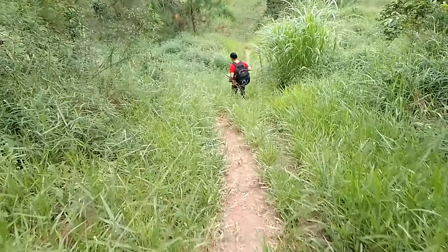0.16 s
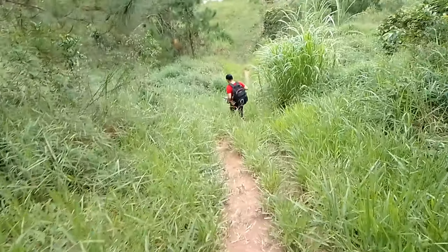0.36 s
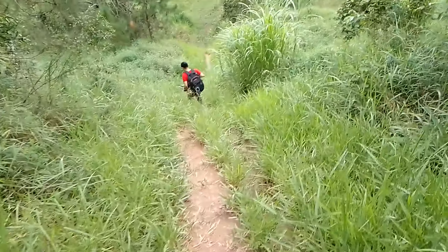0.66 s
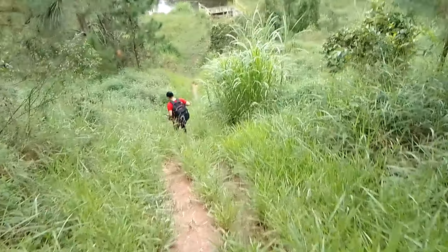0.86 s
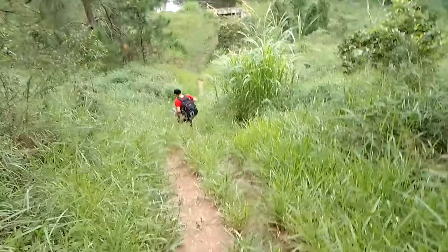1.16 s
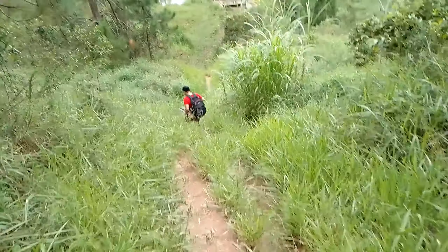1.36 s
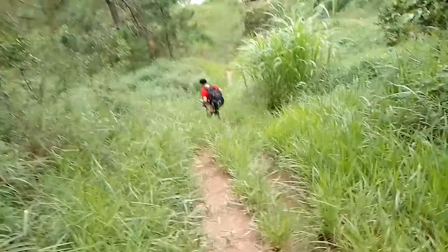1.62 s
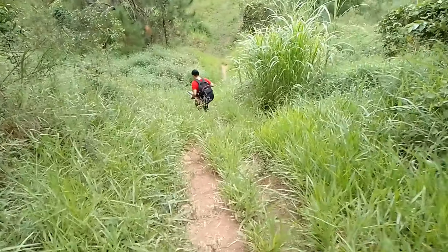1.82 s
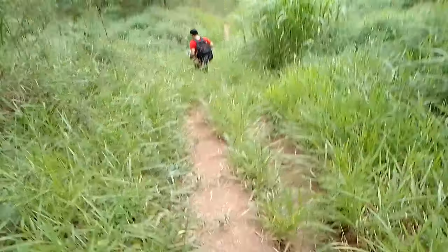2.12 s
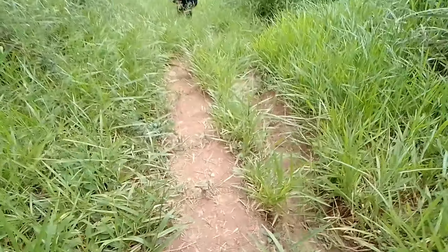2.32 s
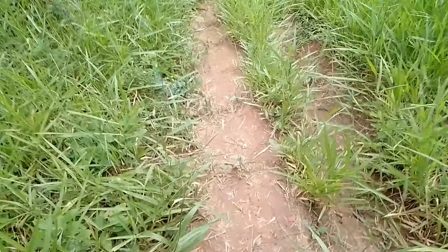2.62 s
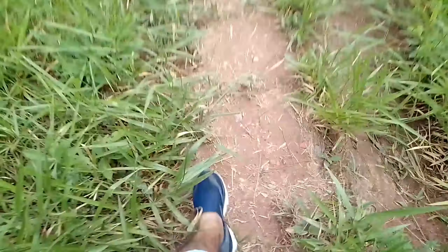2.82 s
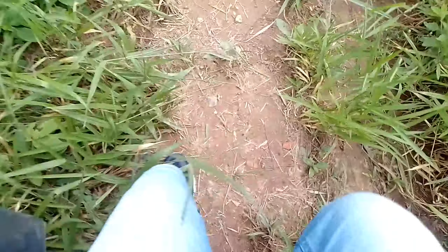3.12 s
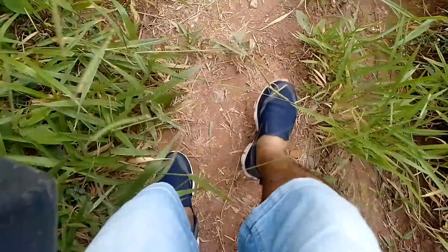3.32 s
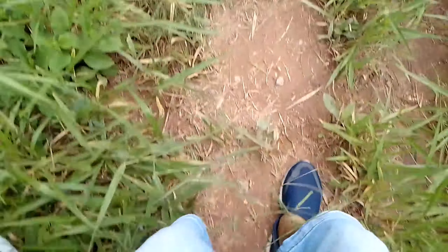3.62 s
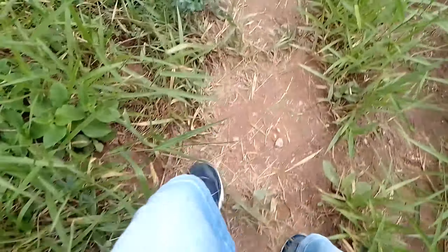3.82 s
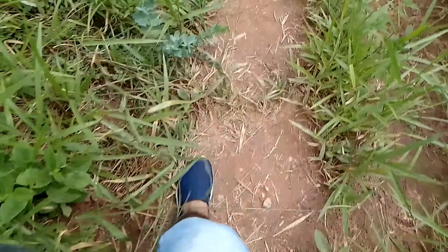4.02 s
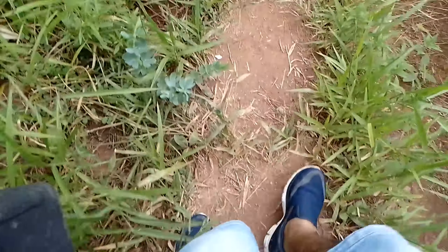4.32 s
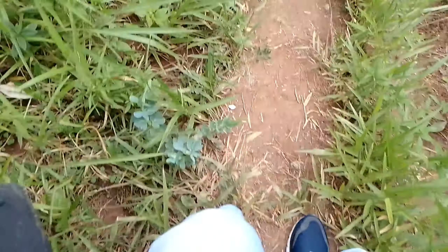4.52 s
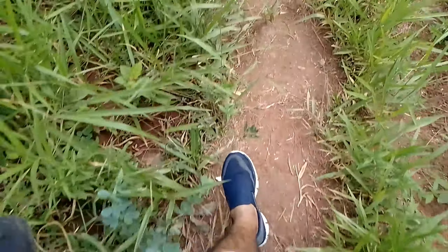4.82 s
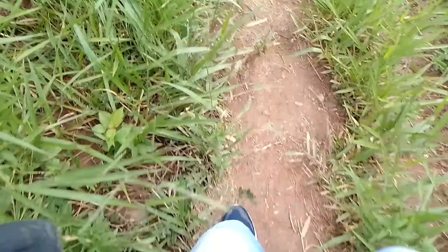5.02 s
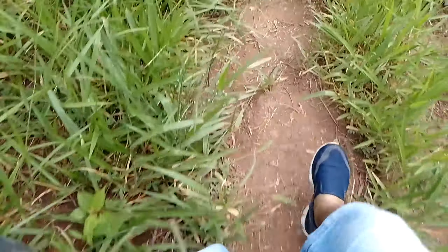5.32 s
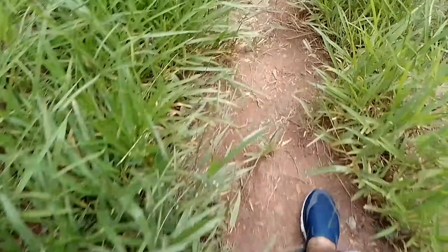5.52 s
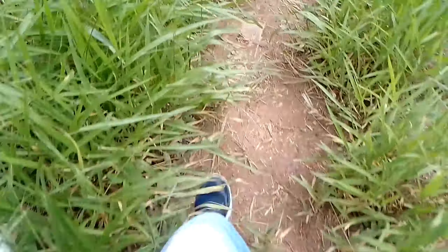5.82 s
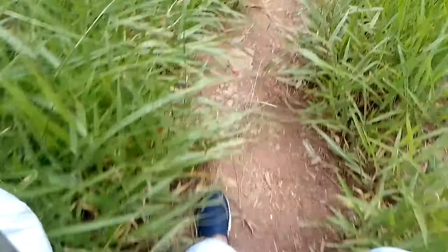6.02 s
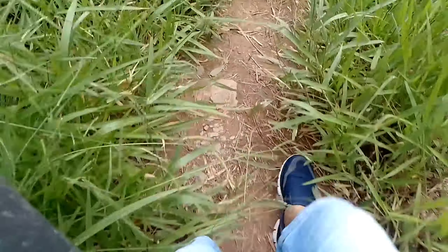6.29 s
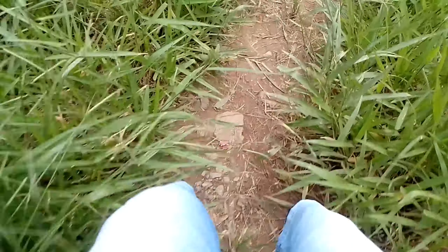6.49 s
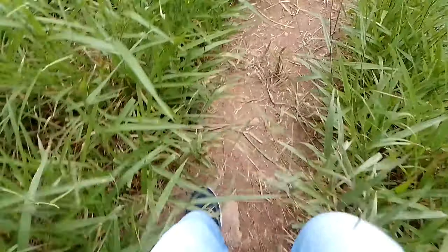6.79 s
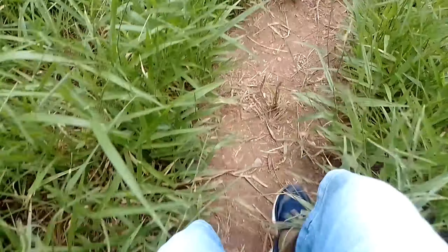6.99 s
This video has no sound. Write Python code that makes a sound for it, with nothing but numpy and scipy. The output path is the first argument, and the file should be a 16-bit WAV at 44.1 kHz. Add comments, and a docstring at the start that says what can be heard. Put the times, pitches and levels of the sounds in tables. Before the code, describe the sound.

A close, dry, mono outdoor sound from a small handheld camera, with dulled extreme treble. From 0 to 1.8 s, brisk swishing and fine hissing of grass against legs mixes with many sharp, hard ticks on the camera case, clustered around 0.6 s with a strong knock, plus low hand jolts and scuffing soles. Around 2.3, 2.7 and 3.0 s come heavier hollow knocks; the grass thins between them, with thin sliding blade notes near 2.5 s. After 3.2 s the clatter nearly stops, save one tick at 4.1 s. Dull thuds land near 3.5 and 4.15 s amid crunchy straw and swishes. About 4.8 to 5.6 s is calmer, a soft rustle with a faint high rasping insect. Crisp scuffs and footfalls return from 5.6 to 6.5 s, then the rustle continues with faint chirps to about 7.1 s.

```python
"""A dirt path through tall grass in a meadow: someone walks along it, a small camera in hand.
Blades swish along the legs and soles scuff the soil, as coloured friction noise swelling with each stroke.
Sharp dry ticks and a few knocks, mostly in the first half, are impulse responses of the camera case.
Short grit bursts and damped low tones mark scuffs and footfalls; an insect chirps a faint rasping note."""
import sys
import numpy as np
from scipy import signal
from scipy.fft import rfft, irfft, next_fast_len
from scipy.io import wavfile
from scipy.ndimage import map_coordinates

SR = 44100
rng = np.random.default_rng(int(sys.argv[2]) if len(sys.argv) > 2 else 0)


def materialize(psi):
    """Save the field psi as 16-bit PCM at rate SR to the path in sys.argv[1].

    A 1-D psi becomes a single channel; in a 2-D psi each row is a channel.
    """
    bounded = np.clip(np.atleast_2d(psi).T, -1, 1)
    quanta = np.round(bounded * 32767).astype(np.int16)
    wavfile.write(sys.argv[1], SR, quanta)


N = 315315  # samples, 7.15 s

# bouts of the insect: start_s, length_s, rate_chirps_per_s, level_db (before scatter)
CHIRP_BOUTS = [(3.72, .05, 8.3, -56), (4.37, .3, 8, -58.5), (4.82, .83, 10.25, -61.5),
               (6.315, .45, 10.4, -55), (6.997, .15, 9.7, -54.5)]
CHIRP_LENGTH_S = .038  # twice the standard deviation of the Gaussian swell
CHIRP_JITTER_S, CHIRP_SCATTER_DB = .005, 1.5

# light taps on the camera near its microphone: start_s, strength_db, contact_hardness_hz, body_pitch_hz
TICKS = [(0.1402, 10, 960, 1360), (0.347, 13, 6800, 1420), (0.4502, 16.5, 6840, 1320),
         (0.5547, 13, 2890, 1230), (0.5649, 12.5, 900, 1230), (0.6054, 13.5, 3600, 1160),
         (0.6103, 16, 590, 1520), (0.614, 8, 1040, 530), (0.6171, 4.5, 880, 530), (0.6714, 12, 2410, 1050),
         (0.9562, 13.5, 6060, 1410), (0.9806, 6.5, 1240, 830), (0.9896, 7.5, 1470, 780),
         (1.0525, 17, 4900, 1250), (1.1633, 14, 4020, 1270), (1.2033, 15, 3230, 1060),
         (1.2932, 10, 1930, 1100), (1.5624, 10, 4080, 1300), (1.5823, -2, 1680, 530),
         (1.5897, 2.0, 820, 527), (1.6186, -3.5, 3790, 680), (1.6655, 14, 3270, 1140),
         (1.7106, 13.5, 3330, 1140), (1.7645, 15, 3850, 1130), (2.0072, 13, 4600, 1400),
         (2.3138, 13.5, 5200, 1210), (2.4692, 18.5, 5130, 1260), (2.7003, 3, 730, 855),
         (2.724, 5.5, 2830, 1000), (3.1388, 6, 1140, 950), (4.0925, 12, 9900, 1370)]
# heavier knocks on the handled case: start_s, strength_db, contact_hardness_hz, body_pitch_hz
KNOCKS = [(0.578, 19.5, 7000, 730), (1.7212, 4, 2860, 510), (2.3328, 19.5, 3370, 683),
          (2.7063, 20, 7000, 960), (3.0324, 19.5, 3070, 917), (3.1613, 15.5, 1530, 600),
          (3.1837, 10.5, 1590, 663), (3.199, 1.5, 500, 450)]
# response of the case to a tick: frequency_hz, gain_db
TICK_BODY = [(30, -41.5), (100, -18), (300, -6.5), (600, -3.5), (950, -2.5), (1350, .5), (1700, -2),
             (2150, -5.5), (3000, -9), (4400, -8), (6500, -8)]
# response of the case to a knock: frequency_hz, gain_db
KNOCK_BODY = [(30, -38), (100, -16.5), (200, -2), (350, 1), (600, 0), (950, 0), (1400, -5.5), (1800, -17.5),
              (2500, -12.5), (4500, -17), (6500, -11.5)]
# body pitch at which each case response is written, Hz
TICK_HZ, KNOCK_HZ = 1300, 900

# a foot takes weight or pushes off: start_s, length_s, jolt_db, sole_db (levels before flutter and trim)
STEPS = [(.11, .04, -63, -62), (.47, 0.15, -54, -53), (.69, 0.045, -70, -51.5), (1.08, .16, -47.5, -47.5),
         (1.59, 0.077, -47, -54), (1.72, 0.044, -52.5, -47), (1.9, .02, -60, -67),
         (2.14, 0.051, -57.5, -54), (2.33, 0.1, -49, -47), (2.6, 0.019, -53, -61),
         (2.705, 0.019, -52, -49.5), (3.035, 0.054, -53, -51), (3.14, .07, -59, -50.5),
         (3.53, 0.066, -57, -47.5), (3.825, 0.028, -74.5, -56), (4.15, 0.093, -54, -51),
         (5.62, .015, -57, -61), (5.93, 0.052, -71, -53), (6.12, 0.057, -53, -53.5),
         (6.24, 0.043, -61, -56), (6.85, 0.03, -61, -56.5)]
STEP_ATTACK_S, STEP_RELEASE_DB_PER_S = .025, 150.5
# handling rumble and shuffling between the steps, before flutter and trim
JOLT_FLOOR_DB, SOLE_FLOOR_DB = -67.5, -60
SHUFFLE_FOLLOWS = .45  # dB of shuffling per dB of steady rustle
# spectrum of a sole on soil: frequency_hz, gain_db
SOIL = [(60, -29.5), (140, -3), (220, -0.5), (450, 3.5), (680, -1.5), (900, -16), (1600, -41.5)]
# spectrum of the hand's jolt: frequency_hz, gain_db
JOLT = [(10, -9), (28, -4.5), (55, -1.5), (120, 1), (170, -7.5), (350, -39.5)]
# short scuffs and snapping stalks: centre_s, rms_db (before the swell), length_s, low_cutoff_hz
SCUFFS = [(0.48, -32, 0.0056, 900), (1.102, -42.5, 0.027, 700), (2.569, -35.5, 0.0027, 1200),
          (2.654, -40, 0.0045, 1490), (2.723, -41, 0.012, 503), (2.835, -45, 0.0058, 1500),
          (3.549, -39, 0.013, 500), (3.578, -37, 0.0087, 700), (3.64, -50, 0.0088, 3500),
          (3.761, -42, 0.012, 3500), (4.156, -40, 0.011, 500), (4.229, -41, 0.0098, 500),
          (4.448, -52, 0.0069, 596), (5.15, -44.5, 0.0065, 4800), (5.816, -41, 0.0053, 2500),
          (5.865, -39, 0.0033, 2200), (5.926, -41.5, 0.022, 2500), (5.963, -35, 0.0062, 2000),
          (5.982, -35.5, 0.0058, 1500), (6.016, -38, 0.0011, 2500), (6.167, -40, .005, 600),
          (6.245, -40, 0.0054, 500), (6.262, -38, 0.0063, 2200), (6.278, -40.5, 0.0044, 300),
          (6.285, -41, 0.0051, 600), (6.481, -43.5, .004, 2200)]
# dull thuds of heel and sole: start_s, level_db, pitch_hz
THUDS = [(1.097, -37, 241), (1.167, -37, 175), (1.647, -37, 61.7), (1.678, -39, 126), (2.617, -36, 406),
         (3.536, -34.5, 280), (3.541, -29.5, 342), (3.588, -32.5, 258), (3.606, -31, 700),
         (4.152, -34, 334), (4.157, -40, 118), (5.627, -36.5, 338), (6.137, -38, 197), (6.163, -39, 260),
         (6.285, -35, 288), (6.4, -36.5, 262), (6.471, -42.5, 147), (6.886, -38, 290)]

# a leg sweeps through a tuft: start_s, length_s, straw_db, swish_db, hiss_db (before flutter and trim)
SWEEPS = [(0.01, 0.19, -56, -47.5, -44), (.213, 0.049, -54, -42, -42.5), (.479, 0.47, -54.5, -46.5, -47),
          (1.043, .21, -51, -45.5, -46.5), (1.294, 0.26, -56, -47, -47.5), (1.68, 0.14, -52, -43, -47.5),
          (1.88, 0.063, -66, -50.5, -62), (2.02, 0.17, -55, -56, -56), (2.313, 0.12, -51, -46.5, -55),
          (2.44, 0.15, -54.5, -44, -58), (2.71, 0.023, -47.5, -47, -49), (2.91, 0.26, -59, -56.5, -57.5),
          (3.15, .13, -48.5, -51, -57.5), (3.335, 0.12, -49, -54, -50), (3.53, 0.039, -47, -57, -50),
          (3.82, 0.021, -42.5, -43, -46.5), (3.925, 0.03, -53, -41.5, -44.5),
          (4.11, 0.09, -47.5, -46.5, -53), (4.265, 0.24, -50, -50.5, -58), (4.54, 0.2, -49.5, -46, -68),
          (4.66, 0.014, -63, -48, -67), (4.785, 0.13, -57, -56, -62), (5.27, 0.042, -55.5, -50, -55),
          (5.79, 0.15, -60, -50, -51), (5.925, 0.081, -50.5, -42, -45), (6.16, .055, -53.5, -46, -51.5),
          (6.39, .13, -53, -49.5, -59), (6.645, 0.25, -58, -53, -53), (6.94, 0.19, -53.5, -51, -58)]
SWEEP_ATTACK_S, SWEEP_RELEASE_DB_PER_S = 0.045, 100  # blades are gathered up, then spring back and settle
# steady rustle of grass that stays against the legs: time_s, swish_db (before flutter and trim)
RUSTLE = [(0, -48), (1.8, -51), (2.25, -55.5), (2.87, -60.5), (3.3, -49.5), (4.5, -53.5), (5.05, -56),
          (5.7, -50), (7.15, -52)]
RUSTLE_STRAW_DB, RUSTLE_HISS_DB = -4, -4  # relative to the steady swish, before trim
# a single blade slides along the trousers and sings: centre_s, length_s, pitch_hz, width_hz, share_0_to_1
SLIDES = [(.80, .14, 2640, 300, 0.1), (1.85, 0.2, 3360, 420, 0.5), (2.416, .08, 2150, 250, 0.24),
          (2.52, 0.2, 3460, 330, 0.75), (3.98, 0.084, 3620, 380, 0.7), (4.653, 0.17, 2780, 297, 0.66),
          (5.5, 0.4, 3200, 297, 0.38), (6.19, 0.056, 3350, 553, 0.5)]
# spectrum of dry straw: frequency_hz, gain_db
STRAW = [(350, -22), (700, -2.5), (1050, -0.5), (1380, -2.5), (1620, 2), (2100, -3), (2500, -12.5),
         (3500, -45.5)]
# spectrum of swishing blades: frequency_hz, gain_db
BLADES = [(1500, -35), (2150, -5.5), (2550, -1.5), (2950, -0.5), (3650, -2), (4050, -5), (4550, -5.5),
          (5000, -13), (6000, -38)]
# spectrum of the fine hiss of blade tips: frequency_hz, gain_db
HISS = [(3800, -30.5), (4700, -5.5), (5150, -4.5), (5750, 2), (6150, 3.5), (6550, 1.8), (6900, -2.5),
        (8000, -10)]

TOP_HZ = 7130  # upper band limit of the camera


def amp(db):
    """Decibels are twenty times the logarithm of amplitude."""
    return 10 ** (np.asarray(db) / 20)


def unit(x):
    """Normalization to unit root-mean-square."""
    return x / np.sqrt(np.mean(x ** 2) + 1e-20)


def gain(points, hz):
    """Spectral envelope: (Hz, dB) points joined on a logarithmic frequency axis."""
    point_hz, db = np.transpose(points)
    return amp(np.interp(np.log(hz + 1), np.log(point_hz + 1), db))


def clock():
    """The time of every sample in seconds."""
    return np.arange(N) / SR


def curves(rows):
    """Linear interpolation: one value per sample for each column after the time."""
    s, *columns = np.transpose(rows)
    return [np.interp(clock(), s, column) for column in columns]


def wobble(rate):
    """Band-limited fluctuation: a smooth curve through random knots, rate knots a second."""
    knots = rng.standard_normal(int(N * rate / SR) + 4)
    return map_coordinates(knots, [clock() * rate])


def bell(t, length):
    """Gaussian envelope whose standard deviation is half the length."""
    return np.exp(-np.square(2 * t / length) / 2)


def filtered(x, response):
    """Linear filtering: the spectrum is multiplied by a response of frequency."""
    size = next_fast_len(len(x) + 8192)  # padding keeps the tail from wrapping onto the start
    return irfft(rfft(x, size) * response(np.fft.rfftfreq(size, 1 / SR)), size)[:len(x)]


def causal(magnitude):
    """Minimum phase: folding the cepstrum gives the fastest-dying response of this magnitude."""
    cepstrum = irfft(np.log(np.maximum(magnitude, 1e-6)))
    half = len(cepstrum) // 2
    cepstrum[1:half] *= 2
    cepstrum[half + 1:] = 0
    return irfft(np.exp(rfft(cepstrum)))


def add(track, s, sound):
    """Superposition: mix a sound into the track at time s."""
    start = int(np.clip(round(s * SR), 0, N - 1))
    track[start:start + len(sound)] += sound[:N - start]


def patches(x, depth_db, span_hz, life):
    """Spectral drift: ever new leaves and spots of ground take part, patch by patch in time and frequency."""
    hz, t, spectrum = signal.stft(x, SR, nperseg=1024)
    knots = rng.standard_normal((600, 600))
    grid = np.meshgrid(hz / span_hz, t / life, indexing="ij")
    field = map_coordinates(knots, grid, mode="wrap")
    return signal.istft(spectrum * amp(depth_db * field), SR, nperseg=1024)[1][:N]


def friction(colour, rate, spread_db, grain_share, patchy_db):
    """Stick-slip friction: random slips of uneven size over a smooth rub, rms 1."""
    sizes = amp(spread_db * np.clip(rng.standard_normal(N), -2, 2))
    slips = (rng.random(N) < rate / SR) * rng.choice([-1, 1], N) * sizes
    share = np.clip(grain_share, 0, 1)  # of the power
    drive = np.sqrt(share) * unit(slips) + np.sqrt(1 - share) * rng.standard_normal(N)
    drifting = patches(drive, patchy_db, span_hz=168.6, life=.09)
    return unit(filtered(drifting, lambda hz: gain(colour, hz)))


def strokes(table, attack_s, release_db_per_s):
    """Addition of powers: every stroke swells, holds and decays exponentially, one row per level column."""
    t, power = clock(), 0
    for s, length, *levels_db in table:
        swell = np.clip((t - s) / attack_s + .5, 0, 1)
        shape = swell * amp(-release_db_per_s * np.clip(t - s - length, 0, 2))
        power = power + np.square(amp(levels_db)[:, None] * shape)
    return power


def insect(pitch_hz, rasp, rasp_rate, flutter_db, length):
    """Modulated tone: random phase and level modulation rasp a narrow note, gated into near-regular chirps."""
    t, chirps = clock(), np.zeros(N)
    flutter = amp(flutter_db * wobble(rasp_rate))
    phase = 2 * np.pi * pitch_hz * t + rasp * wobble(rasp_rate)
    note = unit(flutter * np.sin(phase))
    for start, bout_s, rate, db in CHIRP_BOUTS:
        for s in np.arange(start, start + bout_s, 1 / rate):
            late, louder = rng.standard_normal(2)
            level = amp(db + CHIRP_SCATTER_DB * louder)
            chirps += level * bell(t - s - CHIRP_JITTER_S * late, length)
    return chirps * note


def taps(table, body, body_hz, size=2048):
    """Impulse excitation of a well-damped case: the spot sets its pitch, a soft contact loses treble."""
    track, hz = np.zeros(N), np.fft.rfftfreq(size, 1 / SR)
    for s, db, hard_hz, pitch_hz in table:
        softness = 1 / np.sqrt(1 + (hz / hard_hz) ** 4)
        case = gain(body, hz * body_hz / pitch_hz)
        add(track, s, amp(db) * causal(case * softness))
    return track


def steps():
    """Friction and inertia: soles pad on packed soil in dull lumps, and each step jolts the hand."""
    rustle_db, = curves(RUSTLE)
    shuffle = amp(SOLE_FLOOR_DB + SHUFFLE_FOLLOWS * (rustle_db - rustle_db.mean()))
    jolt_power, sole_power = strokes(STEPS, STEP_ATTACK_S, STEP_RELEASE_DB_PER_S)
    sole_gain = np.sqrt(sole_power + shuffle ** 2) * amp(1.5 * wobble(55) - .6)
    sole = sole_gain * friction(SOIL, rate=200, spread_db=2.5, grain_share=0.41, patchy_db=0.9)
    jolt_gain = np.sqrt(jolt_power + amp(JOLT_FLOOR_DB) ** 2) * amp(0.56 * wobble(25) - 3.0)
    jolt = jolt_gain * friction(JOLT, rate=120, spread_db=3, grain_share=0.14, patchy_db=-0.5)
    return sole + jolt


def scuffs(bright_hz):
    """Transient noise: a sole drags or a stalk gives way in a brief band-limited clump of grit."""
    track = np.zeros(N)
    t = np.arange(SR // 5) / SR - .1  # the burst peaks at t = 0
    for s, db, length, low_hz in SCUFFS:
        def band(hz):
            bass_cut = hz ** 2 / (hz ** 2 + low_hz ** 2)
            treble_cut = 1 / np.sqrt(1 + (hz / bright_hz) ** 2)
            return bass_cut * treble_cut * (hz < TOP_HZ)
        grit = unit(filtered(rng.laplace(size=len(t)), band))
        add(track, s + t[0], amp(db) * grit * bell(t, length))
    return track


def thuds(attack_cycles, ring_cycles, overtone, overtone_db, grit_db):
    """Heavily damped oscillation: the soil gives under a foot, with an inexact overtone and a little grit."""
    track, t = np.zeros(N), np.arange(SR // 10) / SR
    for s, db, pitch_hz in THUDS:
        cycles = pitch_hz * t
        swell = (1 - np.exp(-cycles / attack_cycles)) * np.exp(-cycles / ring_cycles)
        grit = unit(filtered(rng.standard_normal(len(t)), lambda hz: gain(STRAW, hz)))
        ratio = overtone * np.exp(0.2 * rng.standard_normal())
        body = np.sin(2 * np.pi * cycles) + amp(overtone_db) * np.sin(2 * np.pi * cycles * ratio)
        thud = swell / swell.max() * (0.95 * body + amp(grit_db) * grit)
        add(track, s - attack_cycles / pitch_hz, amp(db) * thud)
    return track


def slides(swish):
    """Resonant friction: while one blade slides, part of the swish power gathers round its pitch."""
    for s, length, pitch_hz, width_hz, share in SLIDES:
        part = np.clip(share, 0, 1) * bell(clock() - s, length)
        band = lambda hz: 1 / (1 + ((hz - pitch_hz) / width_hz) ** 4 / 2)
        singing = unit(filtered(rng.standard_normal(N), band))
        swish = np.sqrt(1 - part) * swish + np.sqrt(part) * singing
    return swish


def grass():
    """Superposed friction bands: straw crunches, blades swish, tips hiss; leaves catch, let go and flutter."""
    rustle_db, = curves(RUSTLE)
    steady = amp(rustle_db + np.array([[RUSTLE_STRAW_DB], [0], [RUSTLE_HISS_DB]]))
    sweep_power = strokes(SWEEPS, SWEEP_ATTACK_S, SWEEP_RELEASE_DB_PER_S)
    straw_gain, swish_gain, hiss_gain = np.sqrt(steady ** 2 + sweep_power)
    catch_db = .5 * wobble(16) + 0.92 * wobble(45) + 1.04 * wobble(170)  # shared by all three bands

    crunch = friction(STRAW, rate=400, spread_db=3.5, grain_share=0.23, patchy_db=1.8)
    straw = straw_gain * amp(catch_db - 1.28) * crunch
    blades = slides(friction(BLADES, rate=700, spread_db=5.5, grain_share=.3, patchy_db=1.9))
    swish = swish_gain * amp(catch_db + 0.73 * wobble(30) - 0.82) * blades
    tips = friction(HISS, rate=900, spread_db=5.5, grain_share=0.35, patchy_db=1.0)
    hiss = hiss_gain * amp(catch_db + 0.55 * wobble(60) + 2.2) * tips
    return straw + swish + hiss


def scene():
    """Superposition of insect, camera taps, feet and grass in one channel."""
    meadow = insect(pitch_hz=4515, rasp=1.3, rasp_rate=110, flutter_db=4, length=CHIRP_LENGTH_S)
    camera = taps(TICKS, TICK_BODY, TICK_HZ) + taps(KNOCKS, KNOCK_BODY, KNOCK_HZ)
    footfalls = thuds(attack_cycles=.4, ring_cycles=0.92, overtone=2.15, overtone_db=-5, grit_db=-13)
    feet = steps() + scuffs(bright_hz=4600) + footfalls
    return (meadow + camera + feet + grass())[None]


def record(dry):
    """Band limiting and saturation: the camera cuts the high treble and rounds off peaks near 0.92."""
    band = lambda hz: 1 / np.sqrt(1 + (hz / TOP_HZ) ** 46)
    heard = filtered(dry[0], band)
    rounded = heard / (1 + np.abs(heard / .92) ** 8) ** (1 / 8)
    return filtered(rounded, band)[None]  # saturation adds harmonics above the limit


dry = scene()
out = record(dry)
materialize(out)
```